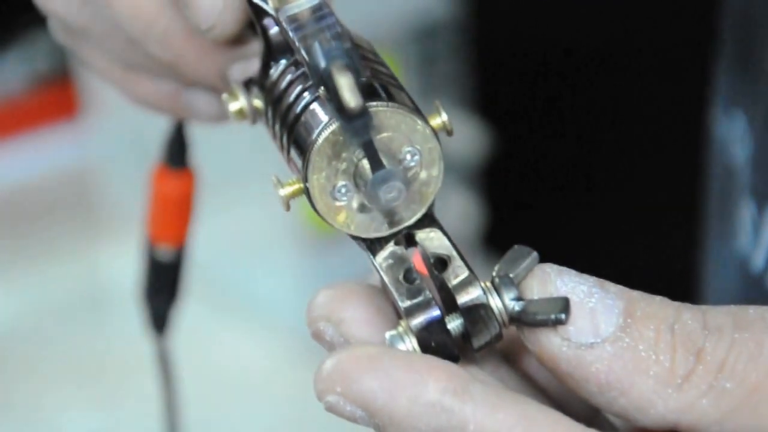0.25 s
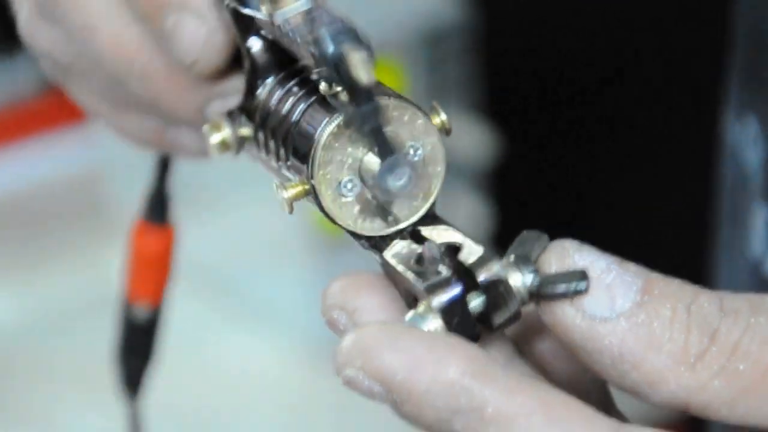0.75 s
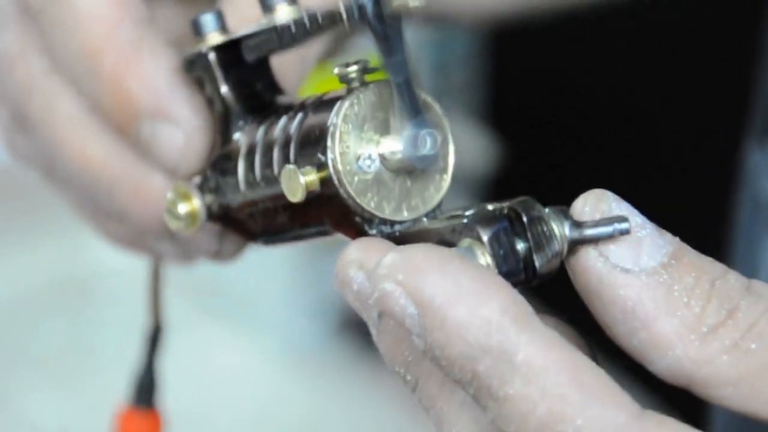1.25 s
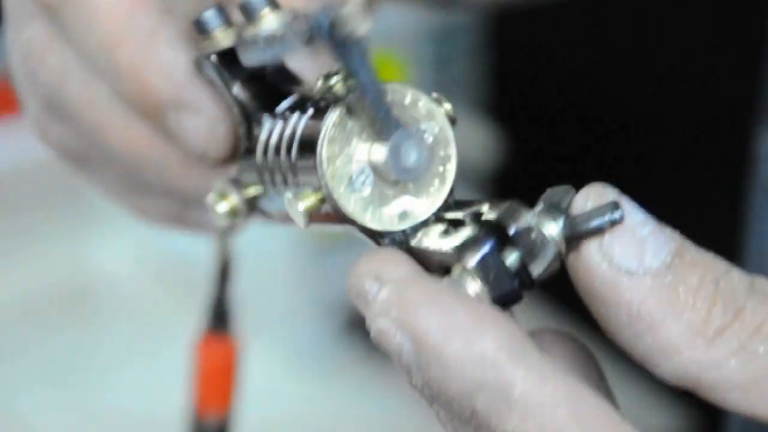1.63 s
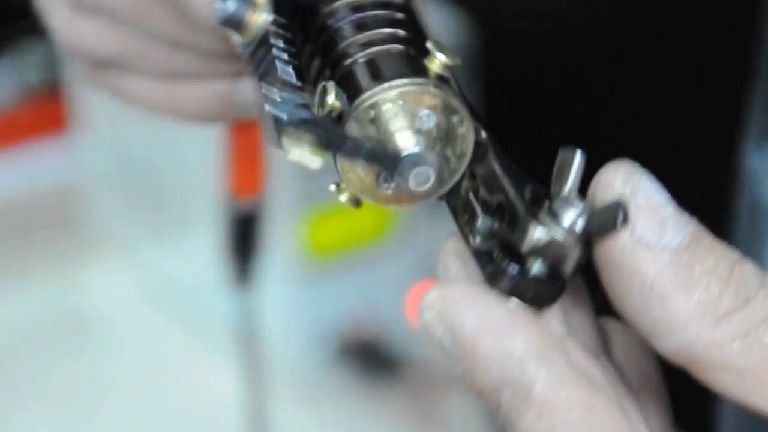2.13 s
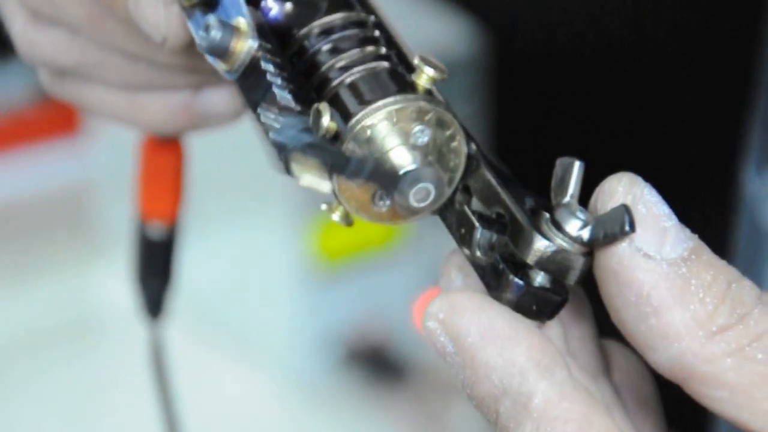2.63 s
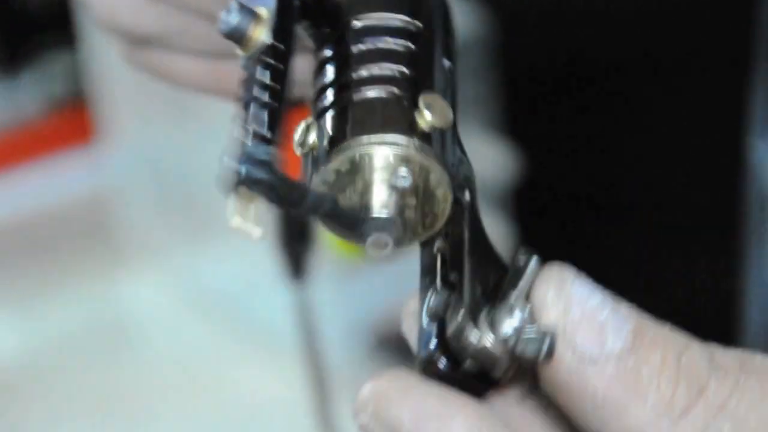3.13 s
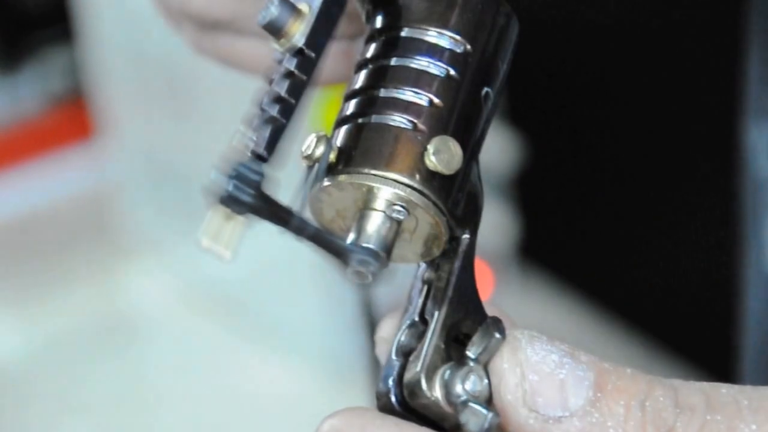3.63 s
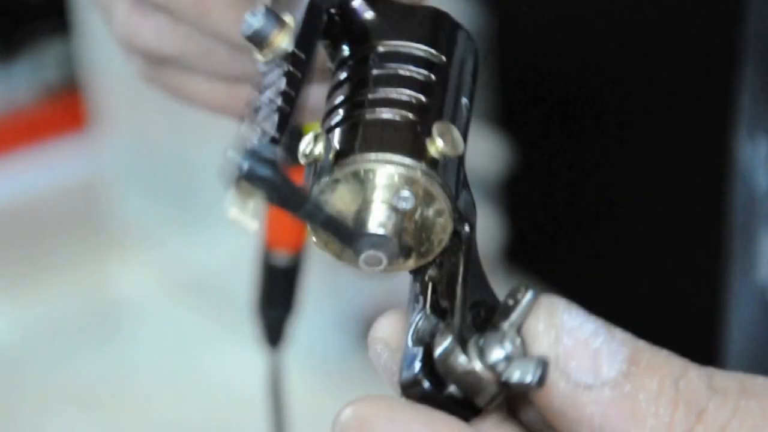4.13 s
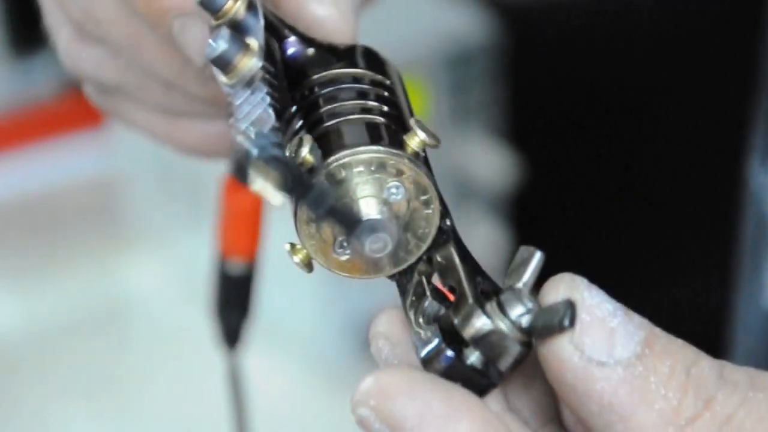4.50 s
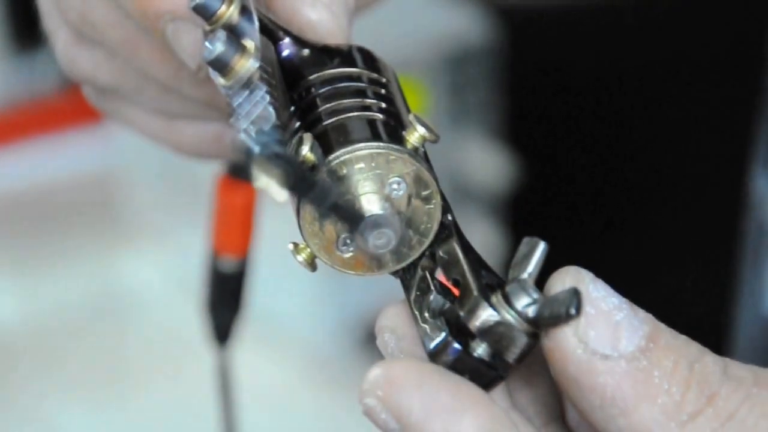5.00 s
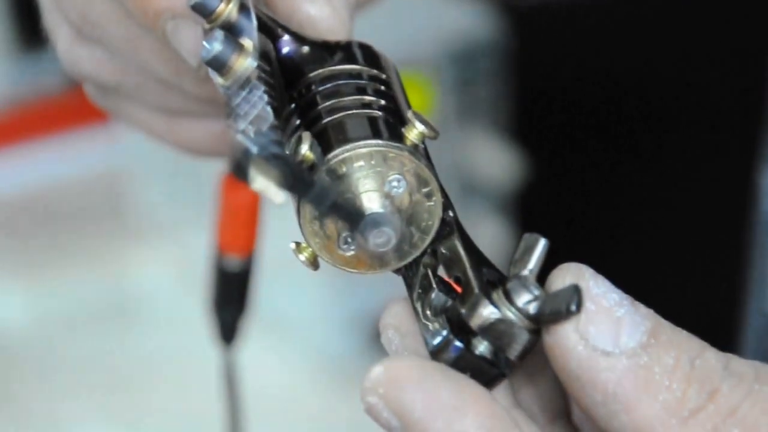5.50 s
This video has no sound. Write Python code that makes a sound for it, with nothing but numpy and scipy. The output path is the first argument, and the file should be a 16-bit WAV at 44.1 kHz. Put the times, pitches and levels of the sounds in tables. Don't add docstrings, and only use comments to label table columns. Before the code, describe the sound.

A small rotary tattoo machine runs throughout, held close to a single mono microphone. It turns roughly 145 times a second, so the crank knocks merge into a hard, nasal, metallic buzz, strongest between about one and five kilohertz, with grainy bearing rattle, a faint uneven low hum and thin dry scraping. From 0 to 0.8 s the tone is steady. Around 0.9 s the hands tip it and the colour changes quickly; until about 1.7 s it is altered, with pitch sagging only a percent or two. By 2 s it has turned back and speed recovers, holding steady until nearly 3 s. Between 3 and 4.2 s it tilts again, the bright edge a little shaded, then returns fuller and stays even to the end near 5.8 s. Slight flutter persists. Behind, a fan drones with low, boxy room resonance. Treble is limited and slightly gritty, with no start or stop.

```python
import sys
import numpy as np
from scipy import signal
from scipy.fft import rfft, irfft, next_fast_len
from scipy.io import wavfile

SR = 44100
rng = np.random.default_rng(int(sys.argv[2]) if len(sys.argv) > 2 else 0)


def invert_db(level):
    return 10 ** (np.asarray(level, dtype=float) / 20)


def wrap_up_sound(samples):
    columns = np.atleast_2d(samples).T
    tamed = np.clip(columns, -1, 1)
    steps = np.round(tamed * 32767).astype(np.int16)
    wavfile.write(sys.argv[1], SR, steps)


N = 254060
CYCLE, STEPS = 20, 1024

SHADE_DB = [
    0.5,
    0,
    0.3,
    1.5,
    -3.5,
    0.7,
]


def evened(x):
    return x / np.sqrt(np.mean(x ** 2) + 1e-20)


def shaped(x, gain_db):
    size = next_fast_len(len(x))
    hz = np.fft.rfftfreq(size, 1 / SR)
    return irfft(rfft(x, size) * invert_db(gain_db(hz)), size)[:len(x)]


def read(points, hz):
    f, value = np.transpose(points)
    return np.interp(np.log(hz + 1), np.log(f + 1), value, left=-90)


def drift(hz):
    lowpass = signal.butter(2, hz, fs=SR, output="sos")
    return evened(signal.sosfilt(lowpass, rng.standard_normal(N)))


def fan():
    # frequency in Hz, density in dB per Hz.
    drone = [(20, -34.5), (42, -10), (72, -21), (100, -17), (160, -8), (300, -6), (450, -7), (610, -10.5),
             (690, -14), (780, -11.5), (920, -10.5), (1100, -15.5), (1600, -17.5), (3000, -24.5),
             (5500, -29)]
    # frequency in Hz, width in Hz, gain in dB.
    room = [(112.7, 16, 7), (130, 4.3, 2.5), (152, 11, 2), (174.8, 12, 10), (200.5, 7.2, 9.5),
            (243.6, 8, 10), (266.2, 6.7, 9), (301, 12, 6), (379, 23.2, 9), (418.3, 21, 7), (462, 6, -1),
            (357, 9.8, 3.5), (208.6, 8.2, -7)]

    def colour(hz):
        waves = sum(db / (1 + (2 * (hz - f) / width) ** 2) for f, width, db in room)
        return read(drone, hz) + waves

    air = evened(shaped(rng.standard_normal(N), colour))
    return invert_db(-37.5 + 0.16 * drift(hz=1)) * air


def stroke(turns, sharp, back):
    out_peak = np.exp(sharp * np.cos(2 * np.pi * turns))
    back_peak = np.exp(sharp * np.cos(2 * np.pi * (turns - .45)))
    return evened(out_peak + back * back_peak)


def cage(turns):
    # share of shaft speed, rms level in dB.
    hums = [(.39, -57), (.585, -62.5)]
    out = np.zeros(N)
    for share, db in hums:
        out += invert_db(db + 2.3 * drift(hz=8.9)) * np.sqrt(2) * np.sin(2 * np.pi * share * turns)
    return out


def scraping(turns, side):
    # frequency in Hz, density in dB per Hz.
    scrape_colour = [(900, -5.5), (1500, -4), (2200, -5.5), (2700, -11), (3500, -5.5), (4300, -1.5),
                     (4800, 5), (5300, -1), (6000, -9)]
    scrape = stroke(turns, sharp=0.45, back=1.0) * rng.standard_normal(N)
    scrape *= invert_db(0.36 * np.interp(side, np.arange(len(SHADE_DB)), SHADE_DB))
    return invert_db(-50.5) * evened(shaped(scrape, lambda hz: read(scrape_colour, hz)))


def beamed(rows, lie):
    rows = np.array(rows)
    return rows[:, 1] + rows[:, 2:] @ lie


def beside(order):
    ball_pass = {-6: 4.4, -1: 4, 0: -2.1, 2: 2.3, 9: 6.5, 10: 7.0}
    away = order - np.ceil(order - .5)
    passes = sum(db * (np.round(away * CYCLE) == step) for step, db in ball_pass.items())
    near_db, fall_db, lowest_db = 3.0, -20.5, -6.5
    return np.maximum(near_db + fall_db * abs(away), lowest_db) + passes


def rattle(order, lie, shade_db):
    # shaft order, rms level per line in dB, dB gained when tipped forward, turned, tipped away.
    rattle_lines = [(4.43, -79, -1.8, -2, 0), (9.5, -78, 2.7, 1, -5.5), (12.9, -68, 2.5, -3.5, 0),
                    (14.7, -73.5, -1.5, -3.5, -3.5), (17.6, -69.5, -2.5, 1.5, 0.3),
                    (29.2, -70.5, 1, 1.2, 1.9), (31.83, -66, 1.5, 0.2, 0.5), (39.7, -82.5, 2.8, 7.5, 1.5)]
    line_order = np.array(rattle_lines)[:, 0]
    level_db = np.interp(order, line_order, beamed(rattle_lines, lie), left=-150, right=-150)
    bright = np.clip((order - 28) / 2.5, 0, 1)
    level_db += beside(order) + bright * shade_db
    chance = rng.standard_normal(len(order)) + 1j * rng.standard_normal(len(order))
    return invert_db(level_db) * chance / np.sqrt(2)


def knock(order, whole, scatter, lie):
    # shaft order, rms level in dB, dB
    knock_rings = [(8.0, -62.5, 3, -21.5, -20.5), (9.0, -58.5, -8, -19, -11.5),
                   (10.0, -57, -0.5, -3.5, -6.5), (11.0, -50, -1.5, -25.5, -6.5),
                   (12.0, -59.5, 2.1, -8.5, -30.5), (13.0, -50.5, 1.1, -10.5, -0.5),
                   (14.0, -58, 6.5, 9.5, -3.5), (16.0, -66, 7, -17.5, -4), (18.0, -55.5, -19, 7.5, -3),
                   (19.0, -66.5, 9.5, 4, 10.5), (20.0, -70, -2.5, 13.5, -31.5), (21.0, -79, 17, 15.7, 10.5),
                   (22.0, -61, -31.5, 3, -3.5),
                   (23.0, -69, 11, 6.5, 2), (24.0, -60, 2, -35.5, -0.9), (25.0, -70, 4.5, 4, 15.5),
                 (26.0, -54.5, -9, -3.5, -5), (28.0, -68.5, 2.5, 0, 8), (30.0, -66.2, 3.7, -3.9, 3.5),
                 (31.0, -65, 2.5, 2.2, -3.5), (32.0, -56.5, -29.2, -2, -6), (33.0, -54.5, -11.5, -45, -22),
                 (34.0, -61, 7, -35.5, -6.5), (36.0, -58, -48, -2, -8.5)]
    parts = np.array(knock_rings)
    half_width, between_db = .15, -81
    rings = 1 / (1 + ((whole[:, None] - parts[:, 0]) / half_width) ** 4)
    power = rings @ invert_db(2 * beamed(parts, lie)) + invert_db(2 * between_db)
    crank = np.zeros(len(order), complex)
    crank[whole * CYCLE] = np.sqrt(power) * np.exp(1j * scatter)
    return crank


def patterns():
    sides = [
        (1, 0, 0.057),
        (0, 0.87, -0.04),
        (0, 0.021, 0.83),
        (0.06, 0.034, -0.025),
        (0.32, .36, -0.4),
        (0.27, .04, -0.33),
    ]
    order = np.arange(CYCLE * STEPS // 2 + 1) / CYCLE
    whole = 8 + np.arange(30)
    scatter = rng.standard_normal(len(whole)) * 0.031 * whole
    scatter += 1.08 * (whole % 2)
    load = stroke(np.arange(CYCLE * STEPS) / STEPS, sharp=1.1, back=1.0)
    loose = np.clip((order - 24) / 6, 0, 1)
    out = []
    for lie, shade_db in zip(sides, SHADE_DB):
        balls = rattle(order, lie, shade_db)
        steady = irfft(knock(order, whole, scatter, lie) + (1 - loose) * balls)
        loaded = load * irfft(loose * balls)
        out.append((steady + loaded) * CYCLE * STEPS / np.sqrt(2))
    return out


def machine():
    # time in seconds, shaft speed in Hz.
    speed = [(0.0, 145.5), (0.72, 145.22), (0.86, 144.71), (0.95, 143.5), (1.08, 144.5), (1.3, 142.46),
             (1.87, 144.0), (2.02, 145.11), (2.45, 145.43), (3.17, 144.73), (3.31, 144.89), (3.46, 144.41),
             (3.74, 145.17), (4.03, 144.69), (4.18, 145.41), (4.61, 145.73), (4.75, 145.52), (5.76, 145.67)]
    # time in seconds, side shown from 0 to 5 (face, flank, flank tipped away, face tilted,
    # top, face close).
    turning = [(0, 0), (.85, 0.07), (.95, 1.4), (1.16, 1.2), (1.24, 1.85), (1.5, 1.9), (1.6, 1.7),
               (1.74, 0.9), (1.89, 0.9), (2.0, 3.0), (2.85, 3.0), (3.1, 3.5), (3.55, 4.0), (4.05, 4.0),
               (4.22, 5.0), (5.76, 5.0)]
    t = np.arange(N) / SR
    shaft_hz = np.interp(t, *np.transpose(speed)) + 0.1493 * drift(hz=14.6)
    turns = np.cumsum(shaft_hz) / SR
    side = np.interp(t, *np.transpose(turning))
    at = np.arange(CYCLE * STEPS) / STEPS
    out = np.zeros(N)
    for k, pattern in enumerate(patterns()):
        share = np.cos(np.pi / 2 * np.clip(side - k, -1, 1))
        out += share * np.interp(turns, at, pattern, period=CYCLE)
    out *= invert_db(0.21 * drift(hz=6.0))
    return out + scraping(turns, side) + cage(turns)


def scene():
    return np.tile(fan() + machine(), (2, 1))


def low_pass(x):
    return signal.sosfilt(signal.butter(12, 7200, fs=SR, output="sos"), x)


def record(dry):
    # frequency in Hz, gain in dB.
    smoothing = [(4800, -0.5), (5200, -0.5), (5512, 0.5), (6000, -11), (6400, -20.5), (6800, -33.5),
                 (7100, -48), (7350, -76)]
    slow = shaped(dry[0], lambda hz: np.interp(hz, [5400, 5900], [0, -30]))
    kept = 4 * slow * (np.arange(N) % 4 == 0)
    filled = shaped(kept, lambda hz: np.interp(hz, *np.transpose(smoothing)))
    return low_pass(np.tile(filled, (2, 1)))


dry = scene()
out = record(dry)
wrap_up_sound(out)
```